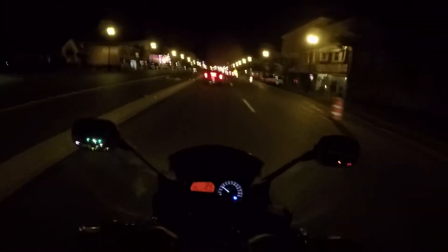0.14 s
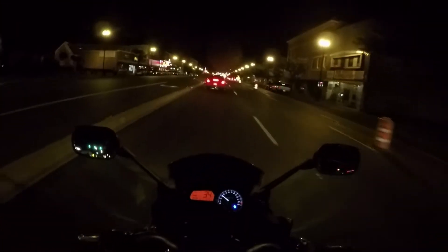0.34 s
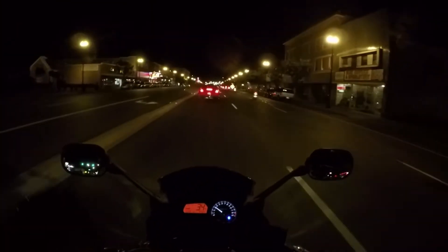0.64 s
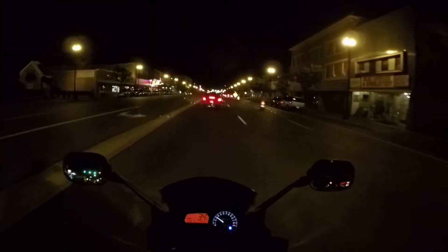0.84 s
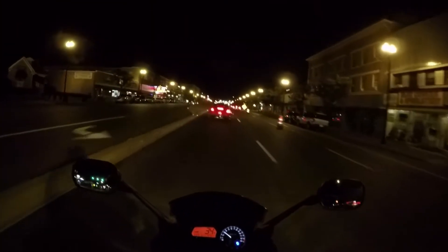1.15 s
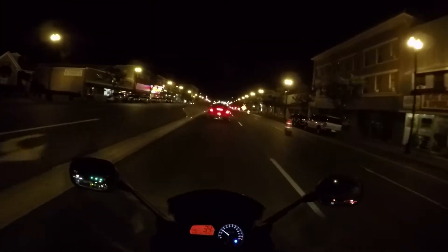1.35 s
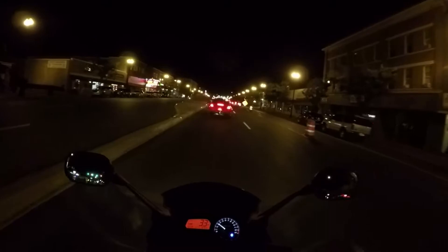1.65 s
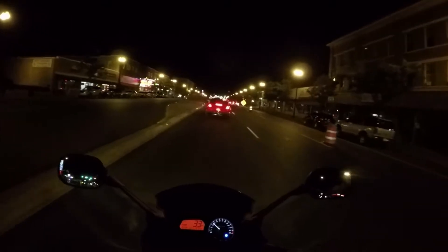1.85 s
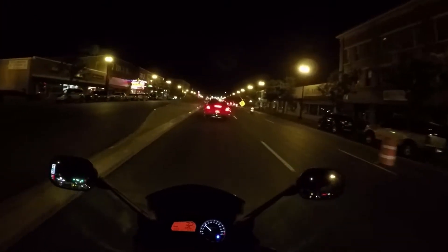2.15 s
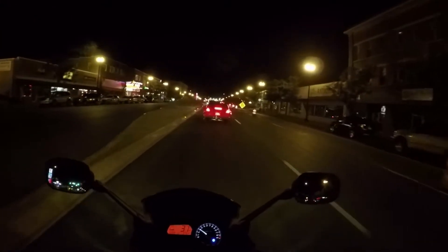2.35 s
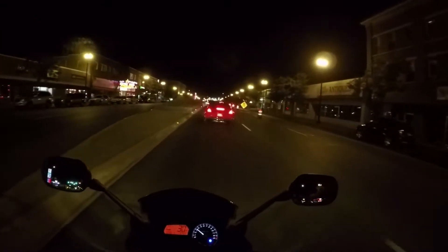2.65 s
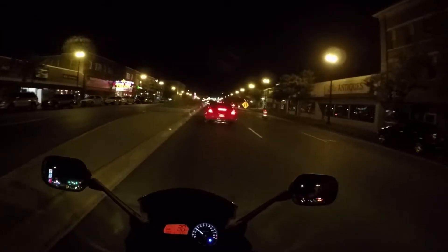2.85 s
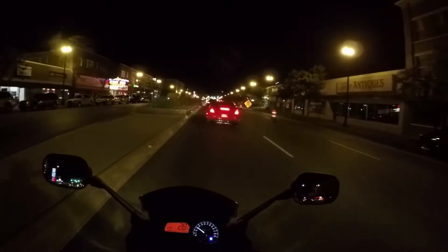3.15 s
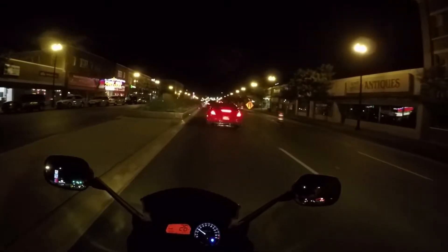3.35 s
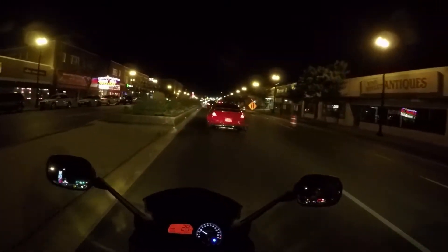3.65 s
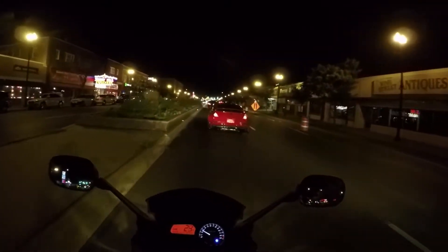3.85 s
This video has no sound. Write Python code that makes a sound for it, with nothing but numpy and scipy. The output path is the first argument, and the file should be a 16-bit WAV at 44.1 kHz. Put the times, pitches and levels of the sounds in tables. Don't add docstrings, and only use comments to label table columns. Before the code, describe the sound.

A motorcycle rides a night street, heard through a sealed camera on the bike. At about 0.05-0.3 s a hard bump thuds, clatters and rings; the sound then ducks to near quiet. Faint gear whine and tyre sing pass around 0.5-1.8 s. Two short throttle blips come near 1.6 and 1.9 s. Wind and engine hum swell, deepening to the end, with low shuddering and light taps near 3 and 3.5 s.

```python
import sys
import numpy as np
from scipy import signal
from scipy.io import wavfile

SR = 44100
rng = np.random.default_rng(int(sys.argv[2]) if len(sys.argv) > 2 else 0)


def generate_wav(sig):
    pcm = np.round(np.clip(np.atleast_2d(sig).T, -1, 1) * 32767).astype(np.int16)
    wavfile.write(sys.argv[1], SR, pcm)


def ratio(d):
    e = np.asarray(d, float) / 20
    return 10 ** e


N = 176400

# start_s, firing_hz, level_db, brightness_db (per octave of order)
ENGINE_CURVE = [(0, 101.2, -29.5, 7.5), (.2, 99.1, -56, 10), (.85, 96, -51, 5), (1.47, 93.43, -38, -1.5),
                (1.54, 102.8, -35, 3.5), (1.61, 121.2, -33, 4.5), (1.66, 121.2, -34.5, -10.5),
                (1.8, 97, -36, -5.5), (1.86, 103.4, -26.5, -0.5), (1.94, 118.7, -38.5, 8),
                (1.99, 116, -29, -9), (2.07, 101.6, -28.5, -4), (2.28, 91.5, -24.5, -1),
                (2.47, 104.9, -26, -1.5), (2.56, 101.9, -22.5, -1.5), (3.1, 92.1, -20.5, 1),
                (3.5, 84.35, -21, -1.5), (4, 78.45, -19, -7)]
# multiple of the firing rate, level_db
ENGINE_ORDERS = [(1, 0), (1.5, -18.5), (2, -8), (2.5, -22), (3, -16), (4, -26), (5, -34.5), (6, -40),
                 (7, -49)]
# start_s, level_db
PANEL_HUM = [(0, -64), (.35, -60), (.82, -60), (.9, -76), (4, -90)]
# pitch_hz, level_db (per Hz)
ROAR_SPECTRUM = [(20, -12), (32, 3), (60, 2), (130, -9), (250, -13), (400, -42), (700, -47.5)]
# pitch_hz, level_db (per Hz)
HISS_SPECTRUM = [(380, 3.5), (680, -9.5), (960, -8), (1900, -18), (3200, -12.5), (5000, -24.5),
                 (8000, -36.5), (15000, -38)]
# pitch_hz, width_hz, boost_db
SHELL_NOTES = [(948, 155, 10.5), (1270, 100, 4.5), (1537, 86, 9.5), (2130, 100, 8), (2500, 180, 4.5),
               (3040, 820, 3.5), (3940, 200, 4.5), (5700, 320, 7), (6510, 180, 5), (8470, 430, 7.5)]
# start_s, level_db
GUSTS = [(0, 1.5), (.1, 1), (.3, -14.5), (.9, -5.5), (1.3, 1.5), (2.2, 0), (3.2, -6), (4, 2)]
# pitch_hz, width_hz, level_db (against the hiss), loudest_s, half_length_s
GAP_WHISTLES = [
    (4200, 70, -24, 2.5, 1.0),
    (4680, 55, -24, 2.5, .55),
    (2760, 70, -19, 1.3, .35),
]
# start_s, level_db
ROAD_SHAKE = [(.3, -33), (.42, -39), (.62, -48), (.75, -32.5), (.88, -37), (.93, -25.5), (1.05, -21),
              (1.3, -32), (1.58, -16), (1.77, -24.5), (1.83, -14), (1.97, -14), (2.04, -27.5), (2.12, -10),
              (2.25, -28), (2.31, -16), (3.3, -14), (3.8, -19.5), (4, -21)]
# middle_s, depth_db, half_width_s
SMOOTH_STRETCHES = [(2.4, 8, .05), (2.57, 12, .03), (2.757, 12, .03), (2.97, 8, .03), (3.156, 5, .015),
                    (3.32, 13, .035), (3.52, 12, .045), (3.706, 16, .03), (3.85, 7, .025), (1.36, 6, .04),
                    (1.66, 4, .04)]
# start_s, pitch_hz, level_db (before the gain)
GEAR_WHINE = [(0, 229.5, -48), (.55, 227.2, -30), (1.0, 222, -26), (1.5, 208.2, -35.5), (2.2, 214.5, -47)]
# start_s, peak_db, low_hz, top_hz, decay_s
HOUSING_KNOCKS = [(.036, -20, 60, 200, .004), (.056, -19, 400, 3000, .006), (.062, -11, 300, 2000, .005),
                  (.068, -12, 350, 1800, .004), (.079, -11, 900, 5000, .002), (.084, -15, 300, 700, .006),
                  (.091, -17, 800, 3000, .003), (.1125, -16, 600, 3300, .002), (.118, -17, 350, 900, .006),
                  (.131, -17, 400, 1300, .004), (.143, -20, 1200, 4200, .0015),
                  (.153, -23, 400, 2500, .004), (.167, -16, 700, 4500, .0015), (.177, -25, 400, 2500, .003),
                  (.186, -28, 400, 1200, .003), (.301, -35, 300, 1600, .003), (.3155, -33, 200, 1500, .001),
                  (.949, -33, 150, 1500, .0008), (1.41, -48, 2000, 3500, .015),
                  (1.843, -46, 3000, 8000, .0015), (2.15, -44, 2000, 3500, .004),
                  (3.03, -30, 1400, 3500, .02), (3.068, -30, 900, 3500, .0015),
                  (3.991, -29, 3500, 5200, .01), (.065, -16, 900, 3500, .003), (.102, -26, 600, 3000, .003),
                  (.125, -24, 800, 3000, .005), (.136, -25, 600, 3000, .003), (.158, -26, 800, 3000, .003),
                  (.294, -40, 250, 900, .005), (.307, -36, 250, 1300, .004), (1.585, -43, 1200, 3400, .018),
                  (3.047, -31, 1400, 3400, .004)]
# start_s, peak_db, pitch_hz, fade_s (time to fall 60 dB)
STRUCK_NOTES = [(.037, -8, 90, .04), (.0605, -6, 64, .09), (.068, -14, 230, .05), (.078, -9, 520, .07),
                (.087, -13, 1070, .04), (.091, -15, 310, .05), (.11, -19, 950, .04), (.112, -18, 340, .04),
                (.128, -20, 880, .04), (.165, -16, 520, .05), (.184, -32, 900, .03), (.211, -34, 700, .03),
                (.222, -26, 260, .05), (.248, -44, 1300, .04), (.293, -34, 300, .04), (.301, -36, 500, .03),
                (.309, -31, 330, .06), (.318, -36, 150, .12), (1.585, -44, 1380, .08),
                (3.595, -26, 350, .12)]
# start_s, pitch_hz, level_db (before the gain)
TYRE_SING = [(0, 1000, -70), (.55, 1000, -54), (.7, 1080, -49), (.85, 950, -58), (1.0, 1030, -48),
             (1.1, 1080, -49), (1.19, 1160, -46), (1.3, 1020, -48), (1.45, 1000, -50), (1.65, 1000, -58),
             (1.77, 1080, -48), (1.85, 1050, -62), (4, 1000, -70)]
# start_s, level_db
RECORDER_GAIN = [(0, -0.5), (.1, 3.5), (.22, -4.5), (.3, -17), (.6, -20), (1.1, -16.5), (1.8, -11.5),
                 (2.6, -3), (3.2, 1.1), (3.6, 1.3), (4, -0.5)]


def in_time(rows):
    s, *columns = np.transpose(rows)
    return [np.interp(np.arange(N) / SR, s, c) for c in columns]


def rms_one(x):
    return x / np.sqrt(np.mean(x ** 2) + 1e-20)


def band_noise_filter(x, order, low_hz, high_hz):
    return signal.sosfilt(signal.butter(order, [low_hz, high_hz], "band", fs=SR, output="sos"), x)


def drift(rate_hz):
    r = np.exp(-80 * np.pi * rate_hz / SR)
    white = rng.standard_normal(N // 40 + 2002)
    slow = signal.lfilter([1], [1, -2 * r, r * r], white)[2000:]
    return np.interp(np.arange(N) / 40, np.arange(len(slow)), rms_one(slow))


def resonance(x, hz, width_hz):
    r = np.exp(-np.pi * width_hz / SR)
    poles = [1, -2 * r * np.cos(2 * np.pi * hz / SR), r * r]
    return signal.lfilter(np.array([1, 0, -1]) * (1 - r * r) / 2, poles, x)


def banded_noise(spectrum, shared_db, own_db):
    hz, db = np.transpose(spectrum)
    out, together = 0, drift(22)
    white = rng.standard_normal((2, N + SR))
    edges = 20 * 2 ** np.arange(0, 10, .5)
    for k, (low, high) in enumerate(zip(edges, edges[1:])):
        middle = np.log(low * high) / 2
        level_db = np.interp(middle, np.log(hz), db, left=-200, right=-200)
        if level_db > -150:
            band = band_noise_filter(white[k % 2], 2, low, high)[SR:]
            out = out + ratio(level_db + shared_db * together + own_db * drift(16)) * band
    return rms_one(out)


def engine():
    hz, db, bright_db = in_time(ENGINE_CURVE)
    turn = 2 * np.pi * np.cumsum(hz * (1 + .003 * drift(25))) / SR
    orders = 0
    for multiple, order_db in ENGINE_ORDERS:
        wobble_db = (.5 + .4 * multiple) * drift(13)
        level_db = order_db + bright_db * np.log2(multiple) + wobble_db
        orders = orders + ratio(level_db) * np.cos(multiple * turn)
    panel_db, = in_time(PANEL_HUM)
    panel = np.cos(4 * turn) + .3 * np.cos(5 * turn)
    return np.sqrt(2) * (ratio(db) * orders + ratio(panel_db) * panel), turn


def wind(turn):
    hiss = banded_noise(HISS_SPECTRUM, shared_db=.9, own_db=.8)
    for hz, width_hz, db in SHELL_NOTES:
        hiss = hiss + (ratio(db) - 1) * resonance(hiss, hz, width_hz)
    hiss = rms_one(hiss) * (1 + .11 * np.cos(turn))
    for hz, width_hz, db, loudest_s, half_s in GAP_WHISTLES:
        level = ratio(db + 4.1 * drift(1.7))
        swell = np.exp(-((np.arange(N) / SR - loudest_s) / half_s) ** 2)
        tone = resonance(resonance(rng.standard_normal(N), hz, width_hz), hz, width_hz)
        hiss = hiss + level * swell * rms_one(tone)
    gust_db, = in_time(GUSTS)
    roar = banded_noise(ROAR_SPECTRUM, shared_db=2.0, own_db=.7)
    return ratio(-40.5) * hiss + ratio(-17.5 + gust_db) * roar


def mount():
    mount_hz, width_hz, lead_db = 45, 7, -27
    push = rng.standard_normal(N + SR)
    swing = resonance(resonance(push, mount_hz, width_hz), mount_hz, 2 * width_hz)
    swing = rms_one(swing)
    size = np.abs(signal.hilbert(swing))
    lead = [(0, lead_db), (.05, lead_db), (.12, lead_db - 21), (.27, lead_db - 25)]
    db, = in_time(lead + list(ROAD_SHAKE))
    t = np.arange(N) / SR
    sag_db = sum(depth_db * np.exp(-((t - s) / half_s) ** 2) for s, depth_db, half_s in SMOOTH_STRETCHES)
    return ratio(db - sag_db) * rms_one((swing / (size + .25))[SR:])


def whine():
    hz, db = in_time(GEAR_WHINE)
    sounding = np.arange(N) < GEAR_WHINE[-1][0] * SR
    return ratio(db + 2 * drift(9.6)) * np.sin(2 * np.pi * np.cumsum(hz) / SR) * sounding


def knocks():
    dull_hz = 900
    tap_s, tap_db, tap_hz, tap_width_s = 3.539, -11.5, 440, .0005
    out, t = np.zeros(N + SR), np.arange(4000) / SR
    noise = rng.standard_normal((len(HOUSING_KNOCKS), len(t)))
    for (s, db, low_hz, top_hz, decay_s), white in zip(HOUSING_KNOCKS, noise):
        burst = band_noise_filter(white * np.exp(-t / decay_s), 2, low_hz, top_hz)
        burst = signal.sosfilt(signal.butter(2, top_hz, fs=SR, output="sos"), burst)
        burst = signal.sosfilt(signal.butter(1, max(dull_hz, low_hz), fs=SR, output="sos"), burst)
        start = int(s * SR)
        out[start:start + len(t)] += ratio(db) * burst / np.abs(burst).max()
    away = np.arange(N) / SR - tap_s
    tap = np.cos(2 * np.pi * tap_hz * away) * np.exp(-(away / tap_width_s) ** 2 / 2)
    return out[:N] + ratio(tap_db) * tap


def dings():
    out, t = np.zeros(N + SR), np.arange(6000) / SR
    for s, db, hz, fade_s in STRUCK_NOTES:
        start = int(s * SR)
        onset = np.minimum(4 * t * hz, 1)
        out[start:start + len(t)] += ratio(db - 60 * t / fade_s) * np.sin(2 * np.pi * hz * t) * onset
    return out[:N]


def bump():
    start_s, ring_hz, rise_s, length_s = .064, 43, .022, .2
    start_turn, buzz_lag_s = .46, .003
    knee = 8
    t = np.maximum(np.arange(N) / SR - start_s, 0)
    decay = np.logaddexp(0, knee * (1 - t / length_s)) / knee
    size = np.minimum(t / rise_s, 1) * decay
    ring = size * np.cos(2 * np.pi * (ring_hz * t + start_turn))
    buzz = band_noise_filter(rng.standard_normal(N), 1, 5535, 13700)
    gate = size ** 0.73 * np.cos(2 * np.pi * (ring_hz * (t - buzz_lag_s) + start_turn)) ** 2
    rattle = band_noise_filter(rng.standard_normal(N), 2, 300, 700)
    return ratio(.2) * ring + ratio(-45) * rms_one(buzz) * gate + ratio(-21) * rms_one(rattle) * size ** 2.06


def sing():
    width_hz = 60
    hz, db = in_time(TYRE_SING)
    turn = 2 * np.pi * np.cumsum(hz) / SR
    return ratio(db) * (drift(width_hz) * np.cos(turn) + drift(width_hz) * np.sin(turn))


def scene():
    gain_db, = in_time(RECORDER_GAIN)
    motor, turn = engine()
    air = wind(turn) + whine()
    top = signal.sosfiltfilt(signal.butter(2, 9600, "high", fs=SR, output="sos"), air)
    air = air - top * (1 - ratio(0.17 * gain_db))
    solid = motor + mount() + bump() + knocks() + dings()
    fade = np.minimum(np.arange(N)[::-1] / SR / .004, 1)
    return (fade * (ratio(gain_db) * (air + sing()) + solid))[None]


def top_cut(x):
    return signal.sosfilt(signal.butter(12, 15150, fs=SR, output="sos"), x)


def record(dry):
    finished = np.clip(dry, -.91, .91)
    return top_cut(finished)


dry = scene()
out = record(dry)
generate_wav(out)
```